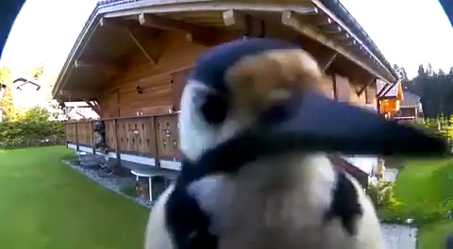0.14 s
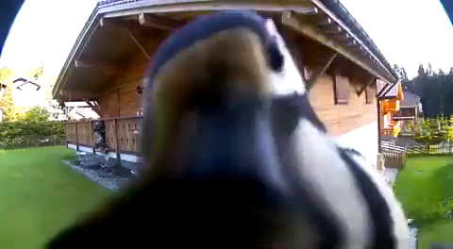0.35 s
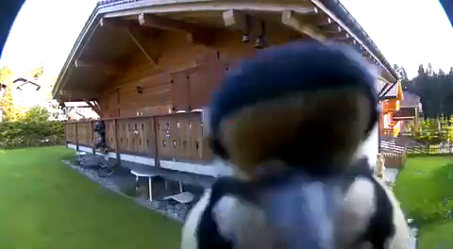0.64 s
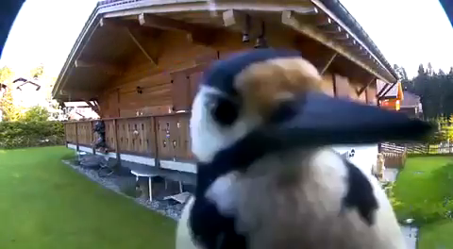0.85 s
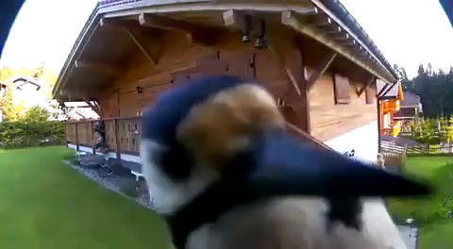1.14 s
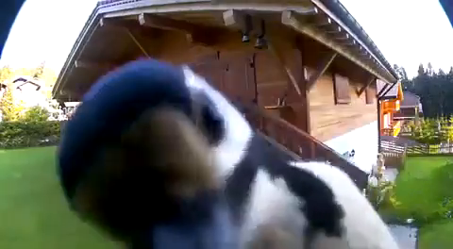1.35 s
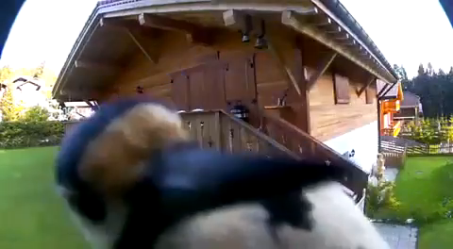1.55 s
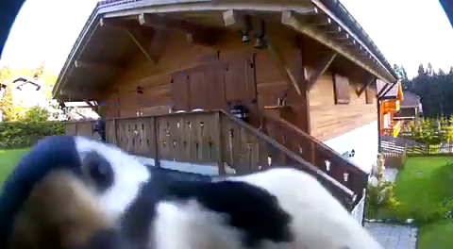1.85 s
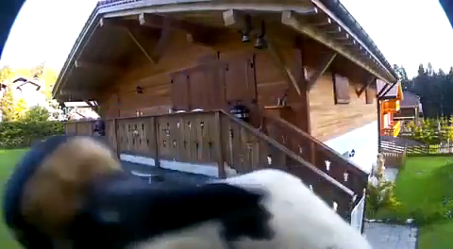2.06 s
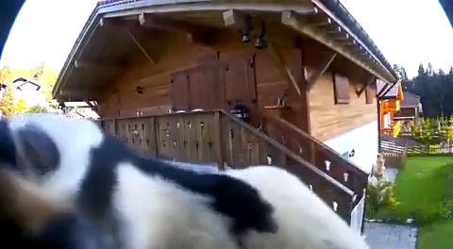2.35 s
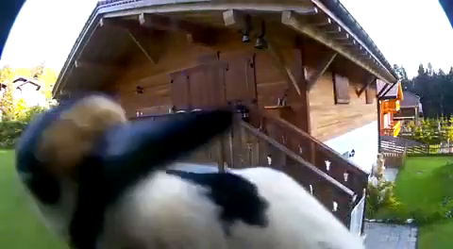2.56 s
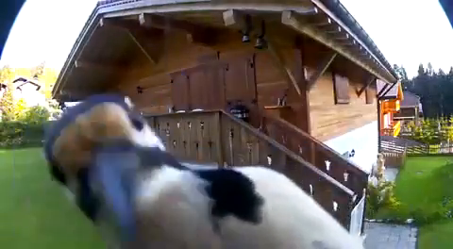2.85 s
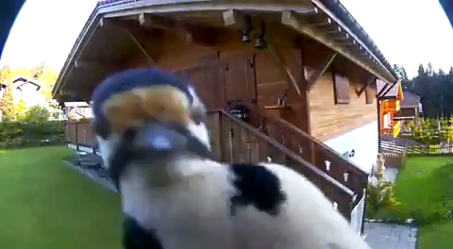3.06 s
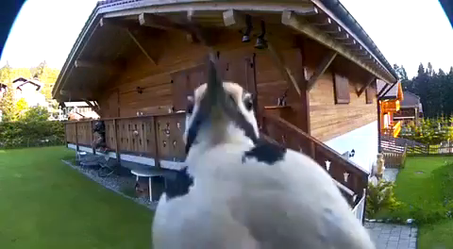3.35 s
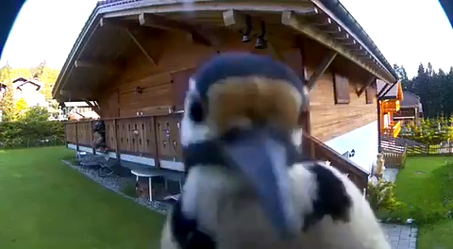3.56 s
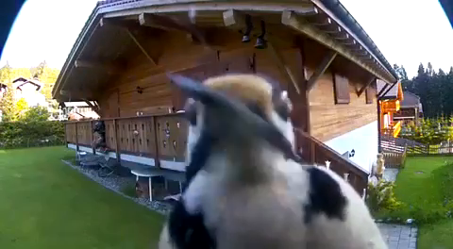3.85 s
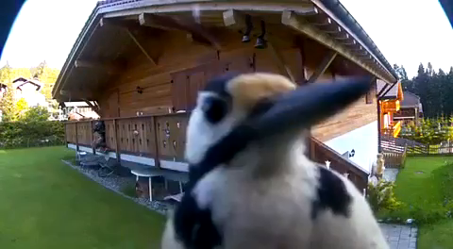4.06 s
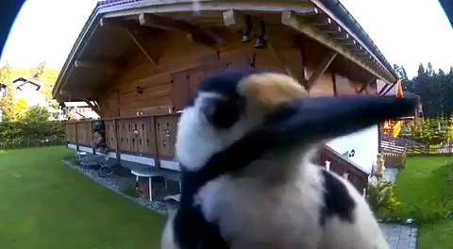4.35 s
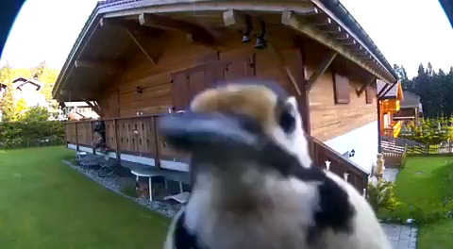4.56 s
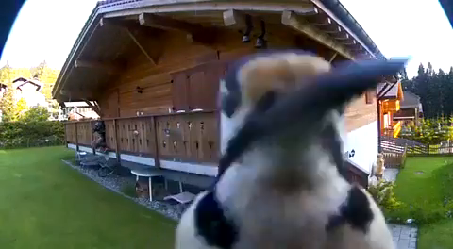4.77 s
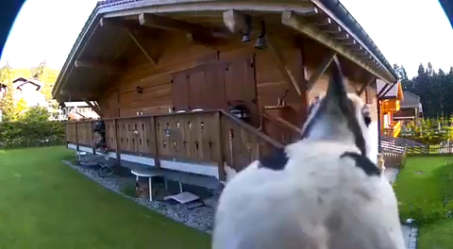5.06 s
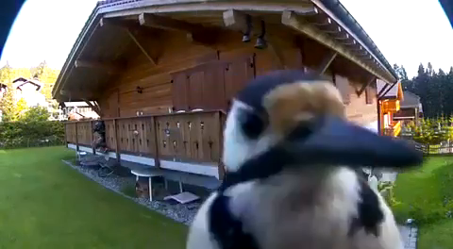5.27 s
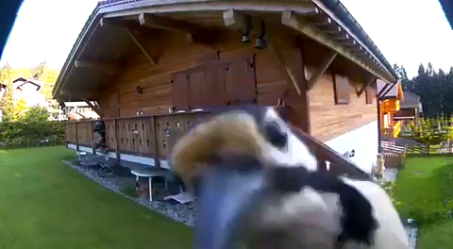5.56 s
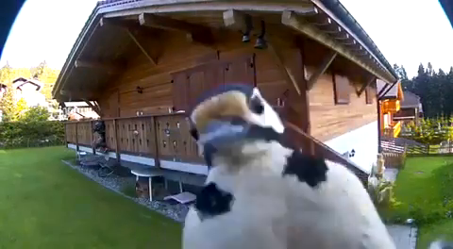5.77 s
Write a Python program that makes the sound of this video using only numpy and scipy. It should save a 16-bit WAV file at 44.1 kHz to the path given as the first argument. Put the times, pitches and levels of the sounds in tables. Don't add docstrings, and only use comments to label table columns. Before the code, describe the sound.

Extremely close, dry contact sounds from inside a small hard housing outdoors: bright clacks that overload the microphone, hollow thumps, quick scratching, claw ticks and dull body bumps. Early blows are bright and plasticky; later ones are duller and woodier, ending in a rapid run of four. A thin metallic ring lingers after some hits. Far birds chirp barely audibly over low rumble and narrow-band hiss.

```python
import sys
import numpy as np
from scipy import signal
from scipy.fft import irfft
from scipy.io import wavfile
from scipy.ndimage import uniform_filter1d

SR = 44100
rng = np.random.default_rng(int(sys.argv[2]) if len(sys.argv) > 2 else 0)


def generate_wav(signal):
    frames = np.transpose(np.atleast_2d(signal))
    scaled = np.clip(frames, -1, 1) * 32767
    pcm = np.round(scaled).astype(np.int16)
    wavfile.write(sys.argv[1], SR, pcm)


def ratio_of_db(decibels):
    return 10 ** (np.asarray(decibels, float) / 20)


N = 260190


def ring(clicks, hz, t60):
    radius = ratio_of_db(-60 / (t60 * SR))
    turn = 2 * np.pi * hz / SR
    return signal.lfilter([0, np.sin(turn)], [1, -2 * radius * np.cos(turn), radius * radius], clicks + 1e-18)


def family(clicks, modes, damping=1):
    return sum(ratio_of_db(db) * ring(train, hz, t60 / damping) for train, (hz, db, t60) in zip(clicks, modes))


def window(start_s, length_s, edge):
    first = round(start_s * SR)
    count = min(round(length_s * SR), N - first)
    return slice(first, first + count), signal.windows.tukey(count, min(edge, 1))


def drift(rate_hz):
    radius = np.exp(-80 * np.pi * rate_hz / SR)
    white = rng.standard_normal(N // 40 + 2002)
    slow = signal.lfilter([1], [1, -2 * radius, radius * radius], white)[2000:]
    return np.interp(np.arange(N) / 40, np.arange(len(slow)), slow / slow.std())


def coloured(spectrum, patchy_db):
    out = 0
    edges = 16 * 2 ** np.arange(0, 9.6, .5)
    white = rng.standard_normal((2, N))
    hz, db = np.transpose(spectrum)
    for k, (low, high) in enumerate(zip(edges, edges[1:])):
        bandpass = signal.butter(2, [low, high], "band", fs=SR, output="sos")
        band = signal.sosfilt(bandpass, white[k % 2])
        level_db = np.interp(np.log(low * high) / 2, np.log(hz), db)
        out = out + band * ratio_of_db(level_db + patchy_db * drift(12))
    return out / out.std()


# (frequency [Hz], density [dB per Hz])
AIR_COLOUR = [(12, -39), (20, -1), (48, -3.5), (157, -1), (203, -12.5), (237, -3.5), (313, -11.5),
              (470, -36.5), (689, -13), (783, -23), (1210, -29), (4660, -30), (7550, -33.5), (8800, -55),
              (11400, -82), (19400, -120)]
# (time [s], level [dB])
AIR_LEVEL = [(0.0, -56.5), (0.569, -53.5), (0.819, -62.5), (1.22, -57), (3.618, -57.5), (3.908, -60),
             (4.44, -60.5), (4.81, -57), (5.449, -58.5), (5.78, -52), (5.9, -50)]
# (time [s], length [s], level [dB])
HISS_GAPS = [(1.437, .03, -9), (1.497, .045, -9), (2.29, .03, -4), (2.42, .03, -18), (1.052, .034, -8)]


def air():
    s, db = np.transpose(AIR_LEVEL)
    level_db = np.interp(np.arange(N) / SR, s, db)
    noise = ratio_of_db(level_db) * coloured(AIR_COLOUR, patchy_db=1.6)
    hiss = signal.sosfilt(signal.butter(2, 900, "high", fs=SR, output="sos"), noise)
    kept = np.ones(N)
    for start, length, gap_db in HISS_GAPS:
        at, hump = window(start, length, edge=.3)
        kept[at] *= ratio_of_db(gap_db * hump)
    return noise - (1 - kept) * hiss


# (time [s], level [dB])
CHIRPS = [(1.6, -69), (1.687, -75.5), (1.749, -66.5), (1.823, -67.5), (1.715, -78), (1.895, -74),
          (3.39, -83)]
CHIRP_S, CHIRP_FROM_HZ, CHIRP_TO_HZ = .04, 2750, 3350
# (time [s], pitch [Hz], level [dB])
PIPS = [(2.02, 4520, -69), (2.709, 4550, -71.5), (2.865, 3080, -70), (2.95, 3120, -69.5),
        (2.745, 2400, -76), (5.17, 3530, -77), (5.235, 2350, -76), (4.615, 2400, -72), (4.626, 3300, -74),
        (4.732, 3330, -77), (4.874, 2410, -68.5), (4.885, 3225, -68.5), (4.936, 4390, -77),
        (5.26, 3300, -76), (5.34, 2300, -73.5)]
PIP_S, PIP_RISE_PER_KHZ = .037, .035
# (time [s], length [s], first pitch [Hz], last pitch [Hz], level [dB])
WHISTLES = [
    (2.141, 0.046, 2734, 2470, -69),
    (2.62, 0.098, 2144, 2312, -74),
    (3.222, 0.17, 2475, 1960, -72),
]


def songs():
    rows = WHISTLES + [(s, CHIRP_S, CHIRP_FROM_HZ, CHIRP_TO_HZ, db) for s, db in CHIRPS]
    for s, hz, db in PIPS:
        bend = PIP_RISE_PER_KHZ * (hz / 1000 - 3.3) / 2
        rows = rows + [(s, PIP_S, hz * (1 - bend), hz * (1 + bend), db)]
    return rows


def birds():
    out = np.zeros(N)
    for s, length, from_hz, to_hz, db in songs():
        at, hump = window(s, length, edge=.6)
        phase = 2 * np.pi * np.cumsum(np.linspace(from_hz, to_hz, len(hump))) / SR
        out[at] += ratio_of_db(db) * hump * np.sin(phase)
    out = out + ratio_of_db(-10) * np.roll(out, round(.015 * SR))
    return out * ratio_of_db(3 * drift(90))


# (frequency [Hz], density [dB per Hz])
BURST_COLOUR = [(290, -38), (500, -16), (683, -16), (818, -2), (1260, -13.5), (1700, -3), (4340, -9.5),
                (5380, -10.5), (7350, -13.5), (8800, -31.5), (11400, -52), (19400, -120)]
# (time [s], length [s], level [dB])
TAILS = [(.492, .09, -43), (.755, .08, -59), (1.13, .09, -66), (2.485, .077, -44), (3.06, .08, -46),
         (5.805, .087, -42)]
# (time [s], length [s])
SWELLS = [
    (0.398, 0.035),
    (5.476, 0.036),
]
LEAD_S, SWELL_DB, FACE_LEAD_DB, RIM_LEAD_DB = .012, -59, -57.5, -60.5


def burst_times():
    leads = []
    for rows, under_db in [(FACE_BLOWS, FACE_LEAD_DB), (RIM_BLOWS, RIM_LEAD_DB)]:
        leads += [(s - LEAD_S, LEAD_S, db + under_db, .9) for s, db, *_ in rows]
    swells = [(s, length, SWELL_DB, .6) for s, length in SWELLS]
    return leads + swells + [(*tail, .05) for tail in TAILS]


def hiss_bursts(share):
    out = np.zeros(N)
    hz, db = np.transpose(BURST_COLOUR)
    colour = ratio_of_db(np.interp(np.log(np.arange(1, 2050) * SR / 4096), np.log(hz), db))
    for s, length, level_db, rising in burst_times():
        draw = rng.standard_normal((3, 2049))
        strength = .1 + (np.abs(draw[2]) < share)
        lines = irfft(colour * (draw[0] + 1j * draw[1]) * strength)
        at = window(s, length, edge=1)[0]
        part = np.linspace(0, 1, at.stop - at.start)
        fade = np.minimum(part / np.clip(rising, .01, 1), 1)
        if rising < .5:
            fade = fade * np.cos(np.pi / 2 * part ** 2)
        out[at] += ratio_of_db(level_db) * fade * np.resize(lines, len(part)) / lines.std()
    return out


# (time [s], length [s], strength [dB], knock over body [dB])
BUMPS = [(0.05, 0.032, -44, -4), (0.131, 0.058, -49, 0.5), (0.181, 0.042, -39, 13), (0.226, 0.03, -49, -4),
         (0.322, 0.019, -37, 1), (0.589, 0.013, -46.5, -12), (1.063, .014, -55, 8.5),
         (1.349, 0.017, -52, -6), (1.548, 0.011, -36, -5), (1.918, 0.022, -47, -6),
         (1.989, 0.0089, -41.5, -5), (2.274, 0.019, -52.5, 6), (2.396, 0.013, -42, 0),
         (3.272, .018, -54, -15), (3.476, 0.021, -53, 0), (4.556, 0.018, -58, -6), (4.666, .012, -55, -6),
         (4.998, .014, -35, -5), (5.622, 0.013, -47.5, -1)]


def bumps():
    out = 0
    for modes, knock_share, family_db in [(DEEP, 0, -6), (BODY, 0, 0), (KNOCK[:3], 1, 0)]:
        press = np.zeros(N)
        for s, length, db, knock_db in BUMPS:
            at, hump = window(s, length, edge=.8)
            press[at] += ratio_of_db(db + knock_share * knock_db + family_db) * hump / np.sqrt(length * SR)
        rubbing = 3 * press * rng.standard_normal((len(modes), N))
        out = out + family(rubbing, modes, damping=1.3)
    return signal.sosfilt(signal.butter(4, 1100, fs=SR, output="sos"), out)


# (time [s], length [s], clack [dB], tick [dB])
SCRATCHES = [(0.18, 0.042, -47, -37.5), (0.32, 0.011, -46.5, -42.5), (1.12, 0.016, -39, -37.5),
             (1.407, 0.029, -35, -35.5), (1.464, 0.03, -40.5, -37), (1.537, 0.044, -46, -38),
             (1.563, 0.0038, -25.5, -60), (1.902, 0.09, -57, -57.5), (1.977, 0.055, -59, -49.5),
             (2.27, 0.041, -68, -57), (2.322, 0.019, -42, -30.5), (2.401, .016, -36.5, -23),
             (2.447, 0.025, -37.5, -36.5), (2.466, .03, -38.5, -30)]
SKID_LATE_S, SKID_S = .013, .023
FACE_SKID_DB, RIM_SKID_DB = (-36.5, -40.5), (-61, -57)


def strokes():
    rows = list(SCRATCHES)
    for hits, (clack_db, tick_db) in [(FACE_BLOWS, FACE_SKID_DB), (RIM_BLOWS, RIM_SKID_DB)]:
        rows += [(s + SKID_LATE_S, SKID_S, db + clack_db, db + tick_db) for s, db, *_ in hits]
    return rows


def scratches(per_s, uneven_db):
    out = 0
    for column, modes in [(2, CLACK + KNOCK[-1:]), (3, TICK)]:
        stroke = np.zeros(N)
        for row in strokes():
            at, hump = window(row[0], row[1], edge=.64)
            stroke[at] += ratio_of_db(row[column]) * hump
        sizes = ratio_of_db(uneven_db * np.minimum(rng.exponential(1, N), 4))
        catches = rng.random(N) < per_s / SR
        clicks = stroke * (sizes * catches) * rng.standard_normal((len(modes), N)) / 4
        out = out + family(clicks, modes)
    return out


# (frequency [Hz], level [dB], t60 [s])
CLACK = [(2060, -6, .016), (2200, -4, .022), (2310, 0, .022), (2550, -9, .013), (2900, -9, .013)]
# (frequency [Hz], level [dB], t60 [s])
DEEP = [(165, -22, .09), (212, 0, .036), (255, -4, .03), (120, -18, .06)]
# (frequency [Hz], level [dB], t60 [s])
BODY = [(305, -24, .06), (378, 0, .024), (350, -20, .05), (430, -3, .022), (590, -12, .014)]
# (frequency [Hz], level [dB], t60 [s])
TICK = [(3539, -0.5, 0.0078), (4390, -13.5, 0.0068), (4632, -1.5, 0.004), (5638, -2.5, 0.0081),
        (6636, -14, 0.0092), (7290, -11.5, 0.0062)]
# (frequency [Hz], level [dB], t60 [s])
KNOCK = [(790, -3, .02), (1000, -7, .015), (1200, -10, .014), (1470, -6, .014), (1760, -2, .017)]
LOWS_LATE_S = .0006


def strikes(rows, spread_db, damping, contact_s, glancing=False):
    rows = np.array(rows)
    out = np.zeros(N)
    for column, modes in enumerate([CLACK, DEEP, BODY, TICK, KNOCK], start=1):
        low = modes in (DEEP, BODY)
        at = np.round((rows[:, 0] + LOWS_LATE_S * low) * SR).astype(int)
        uneven_db = spread_db * rng.standard_normal((len(at), len(modes))).T
        clicks = np.zeros((len(modes), N))
        clicks[:, at] = -ratio_of_db(rows[:, column] + uneven_db)
        if glancing:
            clicks[1::2] *= -1
        if low:
            clicks = uniform_filter1d(clicks, size=round(contact_s * SR), axis=1)
        out += family(clicks, modes, damping)
    return out


# (time [s], strength [dB], edge: tick over clack [dB], heft: body over clack [dB])
PECKS = [(.1782, -54, 5, 3.5), (0.1918, -47, -2, 5), (0.2047, -34, 8.5, -8), (0.4754, -24.5, -11.5, 2.5),
         (.631, -57, 13, 1), (1.3793, -54, -19, 1), (1.423, -41.5, 10, -12), (1.476, -55.5, -3, -8),
         (1.4873, -50, 18.5, 4), (1.566, -40.5, 8.5, -4), (1.9071, -54.5, 3.5, 4), (1.9991, -40.5, -22, 7),
         (2.2691, -47.5, 9, 7.5), (2.3267, -57, 7, -1.5), (2.3342, -62.5, 27, 3), (2.4011, -21, -8, -24),
         (2.4101, -46, 31.5, 17.5), (2.4665, -16.5, 3.5, -9), (2.4733, -24.5, 6.5, -8.5),
         (2.4801, -28, 10.5, 4), (3.614, -29.5, 10.5, -6), (3.78, -47, -12, -11), (3.868, -56.5, -5, -12),
         (4.3723, -60.5, 2, 2), (4.728, -62, -9, -3), (4.829, -60.5, -10, -7), (5.520, -6, -0.5, -3),
         (5.683, -58, 11.5, -6), (5.702, -60, 4, 13), (5.772, -51, 2, -20.5)]
PECK_KNOCK_DB, PECK_DEEP_DB = -2.5, -13
# (time [s], level [dB])
CLAW_TICKS = [(.2214, -51), (0.2475, -60), (1.408, -47.5), (1.545, -48), (1.792, -67), (2.394, -51),
              (4.664, -57), (5.0015, -54)]
CLAW_EDGE_DB, CLAW_HEFT_DB = -1.5, -10


def pecks():
    claws = [(s, db, CLAW_EDGE_DB, CLAW_HEFT_DB) for s, db in CLAW_TICKS]
    rows = []
    for s, db, edge_db, heft_db in PECKS + claws:
        body_db = db + heft_db
        rows.append((s, db, body_db + PECK_DEEP_DB, body_db, db + edge_db, db + PECK_KNOCK_DB))
    return strikes(rows, spread_db=3, damping=1.3, contact_s=.0012, glancing=True)


# (frequency [Hz], t60 [s], [(time [s], level [dB]) when set ringing])
MOUNT = [
    (703, 1.05, [(.483, -57), (.718, -58), (1.10, -40), (3.045, -61), (3.60, -49), (4.591, -43), (4.852, -40), (5.506, -60), (5.658, -59.5), (5.80, -55)]),
    (818, .5, [(.483, -45), (.718, -52)]),
    (630, 1.0, [(4.591, -60), (4.852, -60)]),
    (3015, .5, [(1.10, -49)]),
]
# (frequency [Hz], t60 [s], [(time [s], level [dB]) when set ringing])
LONE_MODES = [(3510, .025, [(1.486, -36), (1.571, -24), (3.047, -19), (3.068, -26)]),
              (2410, .02, [(.508, -24), (1.113, -15), (1.423, -20.5), (1.481, -41), (1.567, -36)]),
              (5600, 0.018, [(1.424, -38), (1.486, -38), (1.546, -38), (1.567, -32), (2.327, -26.5)]),
              (1757, 0.038, [(1.428, -35.5), (1.48, -28), (1.997, -46), (2.33, -39.5), (3.068, -28.5),
              (3.609, -24), (5.508, -13.5), (5.522, -23.5), (5.662, -14.5)]), (1176, 0.025, [(.206, -30),
              (1.567, -36), (3.781, -48.5)]), (349.3, .048, [(.725, -9.5), (1.111, -14), (2.402, -20),
              (3.047, -7.5), (5.509, -8.5), (5.661, -12), (5.802, -8)]), (249, .07, [(5.52, -20.5),
              (5.668, -12), (5.81, -17)]), (213.5, .08, [(1.109, -13)]), (112.2, .08, [(.328, -29)]),
              (289, 0.09, [(5.803, -11)])]


def mount():
    out = np.zeros(N)
    for hz, t60, hits in MOUNT + LONE_MODES:
        for s, db in hits:
            out += ratio_of_db(db) * ring(np.arange(N) == round(s * SR), hz, t60)
    return out


def shoves():
    push = np.zeros(N)
    for hits, late_s in [(FACE_BLOWS, .0021), (RIM_BLOWS, 0)]:
        for s, *_, height in hits:
            length_s = .018 if height < 0 else .014
            at, hump = window(s + late_s, length_s, edge=.78)
            push[at] += height * hump
    return signal.lfilter(*signal.butter(1, 7, "high", fs=SR), push)


def rattle(rows, below_db, t60):
    shake = np.zeros(N)
    for row in rows:
        shake[round(row[0] * SR)] = ratio_of_db(row[4] + below_db)
    dying = signal.lfilter([1], [1, -ratio_of_db(-60 / (t60 * SR))], shake + 1e-18)
    bandpass = signal.butter(1, [600, 7000], "band", fs=SR, output="sos")
    return dying * signal.sosfilt(bandpass, rng.standard_normal(N))


def blow_contacts(hits, mix_db, bounce_db, bounce_s):
    rows = []
    for s, *drive_db in hits:
        rows.append((s, *np.add(drive_db, mix_db)))
        rows.append((s + bounce_s, *np.add(drive_db, bounce_db)))
    return rows


# (time [s], strength [dB], heft [dB], signed membrane shove [full scale])
FACE_BLOWS = [
    (.4812, 12.5, -4, -.7),
    (.7157, 11.5, -2, -.42),
    (1.0975, 11, 0, 1.1),
    (3.0407, 5, -8, 0),
]
# (time [s], strength [dB], depth [dB], edge [dB], signed membrane shove [full scale])
RIM_BLOWS = [
    (3.5986, 5.5, -5.5, 3, -0.81),
    (4.5895, 4.5, -13.5, -10.5, -.04),
    (4.8506, 7, -11, -5.5, -.04),
    (5.5042, 9.5, -1, -4.5, -.15),
    (5.6573, 9, 0.5, 2, 0.056),
    (5.7967, 9.5, 10, 3.5, -0.3),
]
# (clack [dB], deep [dB], body [dB], tick [dB], knock [dB])
FACE_MIX_DB, FACE_BOUNCE_DB = (-1.5, -4, -3, -4, -9.5), (-9, -14, 3.5, -3.5, -19.5)
RIM_MIX_DB, RIM_BOUNCE_DB = (-18.5, 2, 0.0, -1, -8.5), (-34, -18.5, -24.5, -12.5, -23.5)
FACE_BOUNCE_S, RIM_BOUNCE_S, BLOW_CONTACT_S = .0045, .006, .0003


def blows():
    face = [(s, db, heft_db, heft_db, db, db) for s, db, heft_db, _ in FACE_BLOWS]
    rim = [(s, db - edge_db, depth_db, db, db + edge_db, db) for s, db, depth_db, edge_db, _ in RIM_BLOWS]
    face = blow_contacts(face, FACE_MIX_DB, FACE_BOUNCE_DB, FACE_BOUNCE_S)
    rim = blow_contacts(rim, RIM_MIX_DB, RIM_BOUNCE_DB, RIM_BOUNCE_S)
    face_sound = strikes(face, spread_db=4.5, damping=.77, contact_s=BLOW_CONTACT_S)
    rim_sound = strikes(rim, spread_db=7.5, damping=1.1, contact_s=BLOW_CONTACT_S)
    return face_sound + rim_sound + rattle(face + rim, below_db=-13.5, t60=.022)


def scene():
    housing = blows() + ratio_of_db(1.5) * pecks() + ratio_of_db(-0.5) * bumps() + scratches(per_s=1600, uneven_db=4.0)
    return (housing + shoves() + mount() + birds() + air())[None]


def top_cut(x):
    return signal.sosfilt(signal.butter(12, 8990, fs=SR, output="sos"), x)


OVERLOAD, CUTOFF_HZ = 0.37, 8015


def record(dry):
    clipped = np.clip(dry, -OVERLOAD, OVERLOAD) + hiss_bursts(share=.32)
    steep = signal.cheby2(10, 55, CUTOFF_HZ * 1.187, fs=SR, output="sos")
    narrow = signal.sosfilt(steep, clipped)
    narrow = signal.sosfilt(signal.butter(4, 10500, fs=SR, output="sos"), narrow)
    return top_cut(narrow)


dry = scene()
out = record(dry)
generate_wav(out)
```